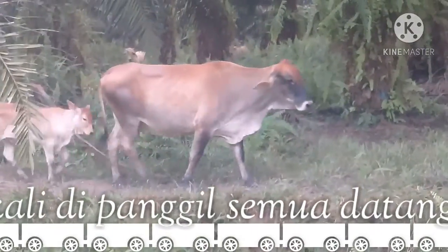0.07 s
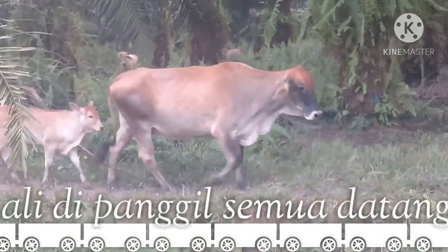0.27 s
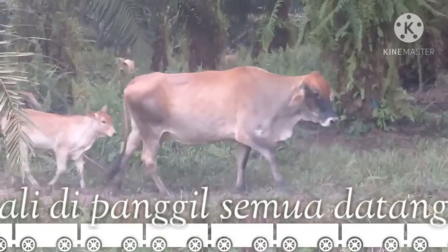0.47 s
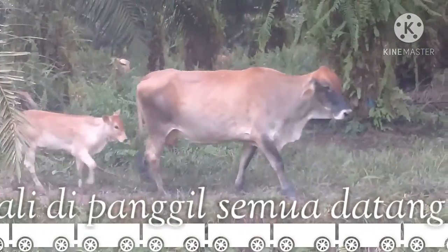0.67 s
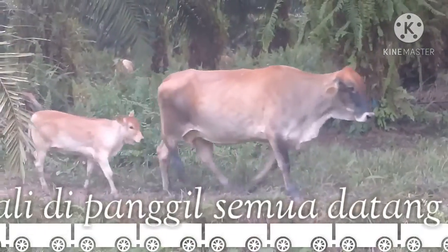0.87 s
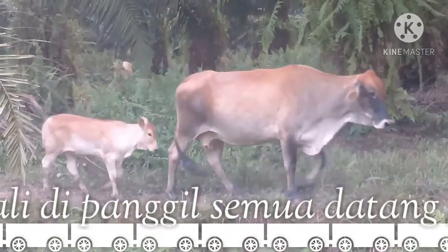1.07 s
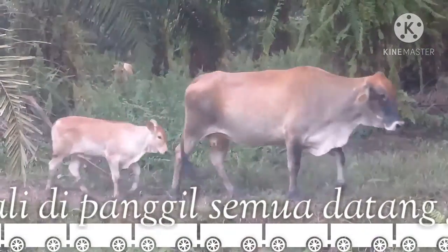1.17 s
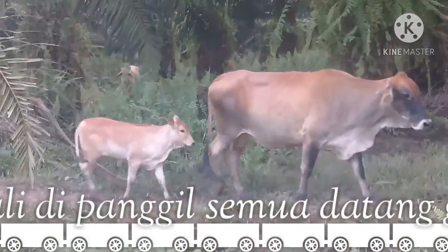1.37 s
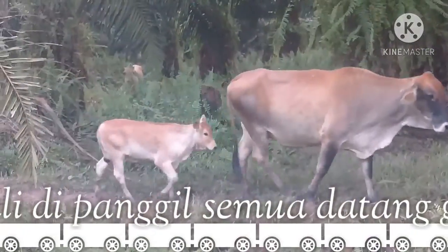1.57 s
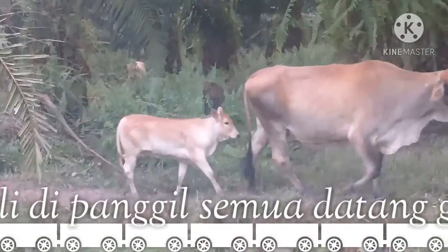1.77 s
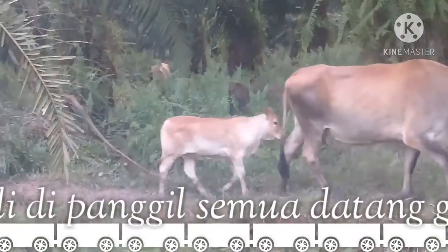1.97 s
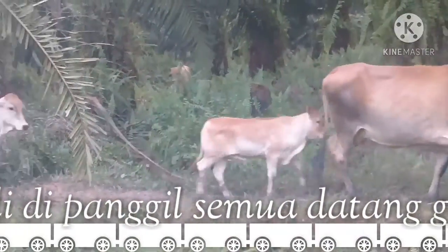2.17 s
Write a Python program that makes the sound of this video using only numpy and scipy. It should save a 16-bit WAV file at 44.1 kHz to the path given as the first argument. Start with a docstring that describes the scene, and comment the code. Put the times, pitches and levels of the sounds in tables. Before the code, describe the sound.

A cow gives one short low moo, starting as a creaky nasal hum before the mouth opens. Its hooves softly crunch and swish through grass among trees, over faint insect hiss and a low rumble.

```python
"""A cow gives one short low moo as it walks through grass among palms.
The moo starts as a creaky hum through the nose; then the mouth opens and slow vocal pulses ring
the throat. Hooves crunch dry litter, legs swish the grass, and the trees echo voice and steps.
Insects hiss all round over a low rumble, and a small bird chirps far off."""
import sys
import numpy as np
from scipy import signal
from scipy.fft import rfft, irfft
from scipy.io import wavfile

SR = 44100
rng = np.random.default_rng(int(sys.argv[2]) if len(sys.argv) > 2 else 0)


def dump_mix(stems):
    """Bounce the given channels to the path in sys.argv[1] as a 16-bit WAV at rate SR."""
    frames = np.atleast_2d(stems).T  # one column per channel
    limited = np.clip(frames, -1, 1)  # hard clip at full scale
    pcm = np.round(limited * 32767).astype(np.int16)
    wavfile.write(sys.argv[1], SR, pcm)


N = 98475
T = np.arange(N) / SR
HZ = np.fft.rfftfreq(N, 1 / SR)
MOUTH_OPENS_S, WIDE_OPEN_S = 1.2895, 1.48


def amp(db):
    """Decibels to gain."""
    return 10 ** (np.asarray(db) / 20)


def unit(x):
    """Scales to rms 1."""
    return x / np.sqrt(np.mean(x ** 2) + 1e-20)


def curve(points):
    """Joins (seconds, value) points by straight lines."""
    return np.interp(T, *np.transpose(points))


def spectrum(points, hz):
    """Reads (Hz, value) points on a log frequency axis."""
    f, value = np.transpose(points)
    return np.interp(np.log(hz + 1), np.log(f + 1), value)


def noise(gain):
    """Noise of rms 1, coloured by a gain per frequency."""
    return unit(irfft(rfft(rng.standard_normal(N)) * gain, N))


def band(hz, octaves):
    """Noise in a bell-shaped band."""
    return noise(np.exp(-.5 * (np.log2((HZ + 1) / hz) / octaves) ** 2))


def bell(s, half_s):
    """A smooth swell centred on s."""
    return np.exp(-((T - s) / half_s) ** 2)


def resonate(x, hz, width):
    """A resonance of gain 1 whose centre can glide."""
    carrier = np.exp(2j * np.pi * np.cumsum(hz * np.ones(N)) / SR)
    pole = np.exp(-np.pi * width / SR)
    return 2 * (carrier * signal.lfilter([1 - pole], [1, -pole], x / carrier + 1e-18)).real


def resonate_twice(x, hz, width):
    """Two like resonances in series, for steeper skirts."""
    return resonate(resonate(x, hz, width), hz, width)


def steep_filter(x, kind, hz, order):
    """A Butterworth lowpass or highpass."""
    return signal.sosfilt(signal.butter(order, hz, kind, fs=SR, output="sos"), x)


def background():
    """Insect hiss and low rumble, fluttering and slowly rising, with a few soft swells."""
    # The outdoor bed with its insect bands. Each row: frequency in Hz, relative level in dB.
    bed_colour = [(18, -64), (30, -21), (73, 5), (108, 3.5), (236, -7), (341, -11), (518, -14),
                  (708, -17.5), (786, -11.5), (1080, -17.5), (1720, -18), (2010, -10), (2360, -15),
                  (2760, -3.5), (3220, -20), (4410, -4), (4900, -8.5), (5580, -2.5), (6530, -21.5),
                  (7250, -16), (9920, -5.5), (10700, -16), (15500, -28.5)]
    # Soft hisses and low hums. Each row: peak time in seconds, level in dB, half length in seconds,
    # centre in Hz, width in octaves.
    swells = [(0.402, -57, .05, 5420, 0.073), (0.36, -61.5, 0.098, 4620, 0.032),
              (0.072, -70, 0.16, 3120, 0.044), (0.62, -58, 0.15, 4470, 0.13),
              (0.958, -54, 0.12, 4190, 0.083), (0.935, -59, 0.12, 4400, 0.42), (0.952, -66.5, 0.1, 1050, 1),
              (0.984, -64.5, 0.11, 247, 0.032), (0.966, -60.5, 0.097, 80, 0.28),
              (1.232, -52, 0.091, 4350, 0.21), (2.2, -60, 0.045, 4900, 0.093), (1.63, -55, 0.6, 129, 0.86)]
    bed_db, rise_db_per_s, flutter_db = -60.5, 1, 0.55
    bed = noise(amp(spectrum(bed_colour, HZ)))
    bed *= amp(bed_db + rise_db_per_s * T + flutter_db * band(36, 0.57))
    return bed + sum(amp(db) * bell(s, half) * band(hz, width) for s, db, half, hz, width in swells)


def bird():
    """A distant bird whistles short falling chirps."""
    # Each row: peak time in seconds, level in dB.
    chirps = [(2.035, -58), (2.075, -50), (2.11, -47.5)]
    centre_hz, fall_hz_per_s = 4680, 28000
    song = np.zeros(N)
    for s, db in chirps:
        cycles = (T - s) * (centre_hz - .5 * fall_hz_per_s * (T - s))
        song += amp(db) * bell(s, half_s=.007) * np.sin(2 * np.pi * cycles)
    return song


def hooves():
    """Hooves crunch dry litter in bursts of noise that die fast, and a late echo returns as a soft burst."""
    # Each row: start in seconds, level in dB, centre in Hz, width in octaves, decay in seconds. # The last row
    # is a late echo, a soft burst of noise rather than a step.
    crunches = [(0.086, -63, 1130, 1, 0.0091), (0.616, -45, 2190, 0.25, 0.0069),
                (0.615, -54, 790, 1, 0.0091), (.668, -50.5, 830, 0.79, 0.017),
                (0.67, -48, 3000, 0.6, 0.011), (0.816, -37, 4210, 0.15, 0.0026),
                (2.06, -50, 1230, 0.53, 0.057)]
    return sum(amp(db) * band(hz, width) * (T > s) * np.exp(-abs(T - s) / decay)
               for s, db, hz, width, decay in crunches)


def grass():
    """Legs brush the grass, which hisses and crackles."""
    # Each row: peak time in seconds, level in dB, half length in seconds.
    swishes = [(0.164, -71, 0.034), (.612, -59, 0.019), (0.65, -63.5, 0.11), (1.255, -57, 0.042),
               (1.363, -53, 0.023), (1.59, -49, 0.0059), (1.64, -59, 0.13), (1.826, -62, 0.038),
               (2.016, -72, 0.014), (2.12, -63.5, .035)]
    # The tone of the rustle. Each row: frequency in Hz, relative level in dB.
    colour = [(300, -30), (900, -7.5), (2500, -3), (7000, -17.5), (11500, -1.5), (15500, -17)]
    snaps_per_s, snaps_db = 1000, -6
    snaps = unit(rng.standard_normal(N) * (rng.random(N) < snaps_per_s / SR))
    friction = rng.standard_normal(N) + amp(snaps_db) * snaps
    rustle = unit(irfft(rfft(friction) * amp(spectrum(colour, HZ)), N))
    return rustle * sum(amp(db) * bell(s, half) for s, db, half in swishes)


def grove(x):
    """Early scatter from nearby leaves, a diffuse tail and one blurred echo from the tree line."""
    # The trees' reverb. Each row: frequency in Hz, seconds to fall 60 dB, relative level in dB.
    reverb = [(100, 0.45, -11), (256, 0.4, -3.5), (435, 0.67, 5), (764, 0.47, -3.5), (1200, 0.49, 2),
              (1486, 0.93, -12.5), (2710, 0.68, 6.5), (12400, .2, 3)]
    hz, t, grains = signal.stft(rng.standard_normal(N), SR, nperseg=256)
    t60, colour = (spectrum(np.array(reverb)[:, [0, k]], hz)[:, None] for k in (1, 2))
    tail = signal.istft(grains * amp(colour - 60 * t / t60), SR, nperseg=256)[1][:N]
    tail *= np.minimum(T / 0.02, 1)
    echo = band(1040, 0.57) * bell(0.1683, half_s=0.016)
    leaves = rng.standard_normal(N) * bell(0.0054, half_s=0.0021)
    response = sum(amp(db) * part / np.linalg.norm(part)
                   for db, part in [(-9.5, tail), (-31.5, echo), (-15, leaves)])
    return signal.fftconvolve(x, response)[:N]


def vocal_folds():
    """Slow, slightly uneven pulses, each with a raspy puff. Gives drive, cycle count and puff shape."""
    # Each row: time in seconds, pulse rate in Hz.
    pitch = [(1.085, 67.6), (1.12, 47.73), (1.16, 49.54), (1.2, 54.62), (1.31, 63.23), (1.38, 67.51),
             (1.53, 69.76), (1.62, 67.05), (1.72, 65.08), (1.8, 57.38), (1.84, 48.16)]
    jitter, shimmer_db, rasp_db, puff_s = .003, 0.29, -21, .007
    rate = curve(pitch)
    cycles = np.cumsum(rate * (1 + jitter * band(33, .5))) / SR
    cycles -= np.interp(MOUTH_OPENS_S, T, cycles)  # cycle zero falls as the mouth opens
    pulse_age = (cycles % 1) / rate
    clicks = np.diff(np.floor(cycles), prepend=np.floor(cycles[0])) * SR / (2 * rate)
    pulses = clicks * amp(shimmer_db * band(23, 0.38))
    puff = unit(np.exp(-pulse_age / puff_s))
    rasp = amp(rasp_db) * pulses.std() * puff * rng.standard_normal(N)
    return pulses - .5 + rasp, cycles, puff  # the pulses average .5, so this centres them


def breath(envelope):
    """Air hisses out of the mouth with each pulse."""
    # Each row: frequency in Hz, relative level in dB.
    colour = [(300, -30), (1000, 20), (2300, 18.5), (3100, -1), (4400, 12), (5300, 6), (6500, -6.5),
              (9000, -16), (15000, -19)]
    return amp(-42.5) * envelope * noise(amp(spectrum(colour, HZ)))


def chest(cycles, mouth):
    """The chest hums the fundamental; a strong second harmonic joins as the mouth opens."""
    # Each row: time in seconds, level of the fundamental in dB.
    swell = [(1.1, -90), (1.15, -58.5), (1.3, -56.5), (1.74, -54.5), (1.83, -56), (1.86, -86)]
    phase = 2 * np.pi * cycles
    return -amp(curve(swell)) * (np.sin(phase) + amp(11.5) * mouth * np.sin(2 * phase))


def upper_ring(drive, mouth):
    """Faint high resonances ring while the mouth is open and in a creak at each end of the moo."""
    # Each row: centre in Hz, gain in dB.
    resonances = [(2620, -54.5), (3320, -64.5), (3800, -58.5), (4400, -59.5), (5100, -60.5)]
    # Each row: peak time in seconds, half length in seconds, level in dB.
    creaks = [(1.099, 0.019, -3), (1.817, 0.021, -1.5)]
    brightness = mouth + sum(amp(db) * bell(s, half) for s, half, db in creaks)
    return sum(amp(db) * resonate_twice(drive * brightness, hz, width=350) for hz, db in resonances)


def nasal_hum(drive, cycles):
    """Pulses ring the nose, with extra resonances while the lips are shut."""
    # Each row of both: centre in Hz, width in Hz, gain in dB.
    nasal = [(195.2, 35, -35.5), (266.3, 34.6, -27)]
    lips_shut = [(477, 81, -38.5), (1450, 325, -43.5), (1486, 53, -59), (1855, 29, -37.5)]
    onset_db = 5.5 * np.clip(-cycles / 10, 0, 2)  # eases off as the opening nears
    shut = (cycles < -.5) * amp(onset_db)
    hum = sum(amp(db) * resonate_twice(drive, hz, width) for hz, width, db in nasal)
    return hum + sum(amp(db) * resonate(drive * shut, hz, width) for hz, width, db in lips_shut)


def throat(drive):
    """Pulses ring the throat, whose resonances glide as the mouth widens."""
    # Each row: centre in Hz as the mouth opens, centre in Hz when wide open, width in Hz, gain in dB.
    formants = [(601, 644, 48.7, -37), (844, 800, 44, -39), (868, 909.3, 51.4, -28), (1108, 1085, 102, -37),
                (1370, 1416, 210, -42.5), (1527, 1530, 86, -34.5), (1900, 1868, 110, -36),
                (2088, 2150, 87, -63)]
    gape = np.clip((T - MOUTH_OPENS_S) / (WIDE_OPEN_S - MOUTH_OPENS_S), 0, 1)
    vowel = sum(amp(db) * resonate(drive, start_hz + (end_hz - start_hz) * gape, width)
                for start_hz, end_hz, width, db in formants)
    return steep_filter(vowel, "highpass", hz=502, order=4)


def moo():
    """Vocal pulses sound through the nose and, once the lips part, through the mouth too."""
    # The sound leaving each opening. Each row of both: time in seconds, relative level in dB.
    mouth_levels = [(1.278, -42), (1.287, -2), (1.36, 0.4), (1.46, -0.5), (1.53, 0.5), (1.585, 0.5),
                    (1.605, 3.5), (1.72, 0.5), (1.79, -1), (1.81, -3), (1.826, -29), (1.85, -8),
                    (1.866, -48)]
    nose_levels = [(1.06, -42.5), (1.105, -21), (1.147, -22), (1.19, -11.5), (1.275, -6.5), (1.33, -1),
                   (1.38, 0), (1.46, 5), (1.52, 1), (1.74, -3.5), (1.8, -5.5), (1.84, -6.5), (1.86, -49)]
    ground_delay_s, ground_gain = 0.003225, 0.17
    drive, cycles, puff = vocal_folds()
    voiced = (T > nose_levels[0][0]) * (T < nose_levels[-1][0])
    mouth, nose = amp(curve(mouth_levels)) * voiced, amp(curve(nose_levels)) * voiced
    body = throat(drive * mouth) + nasal_hum(drive * nose, cycles)
    body += ground_gain * np.interp(T - ground_delay_s, T, body)  # bounce off the ground
    body = steep_filter(body, "lowpass", hz=1963, order=8)
    return body + upper_ring(drive, mouth) + voiced * chest(cycles, mouth) + breath(mouth * puff)


def scene():
    """The cow among the trees, over the bird and the background, in mono."""
    cow = moo() + hooves() + grass()
    return (cow + grove(cow) + bird() + background())[None]


def record(dry):
    """Cuts the treble above 15.6 kHz."""
    treble_cut = signal.firwin(511, 15600, window=("kaiser", 9), fs=SR)
    return signal.oaconvolve(dry, treble_cut[None], "same")


dry = scene()
out = record(dry)
dump_mix(out)
```